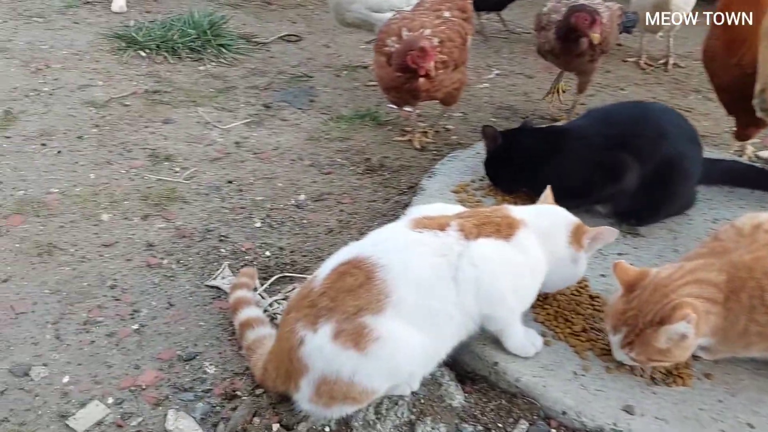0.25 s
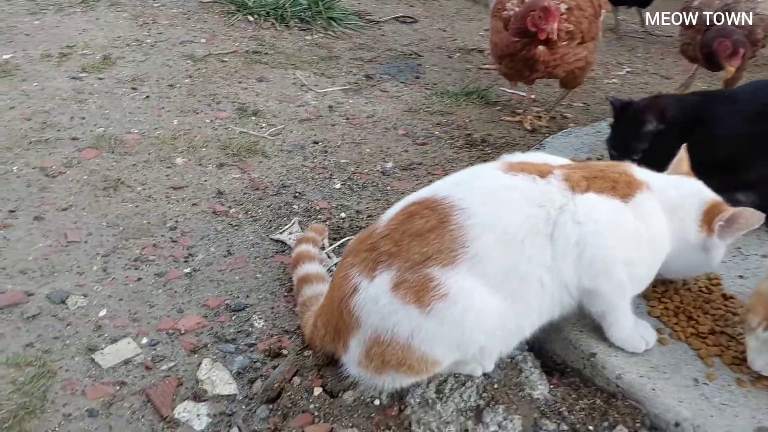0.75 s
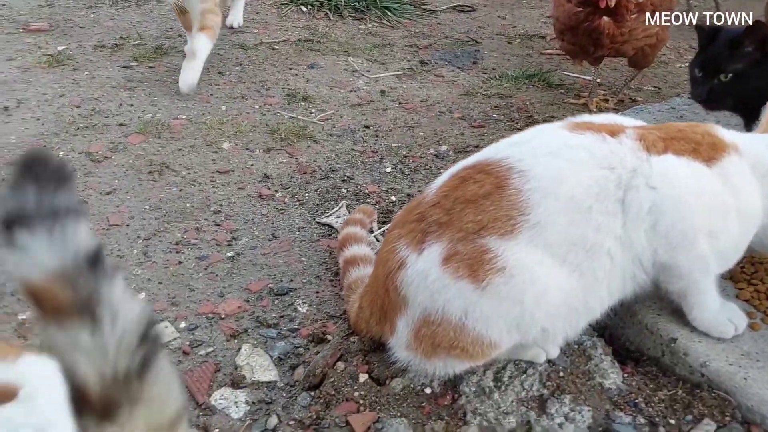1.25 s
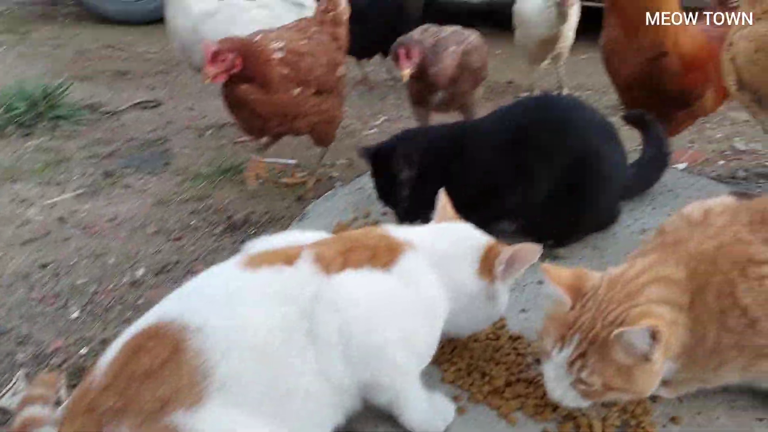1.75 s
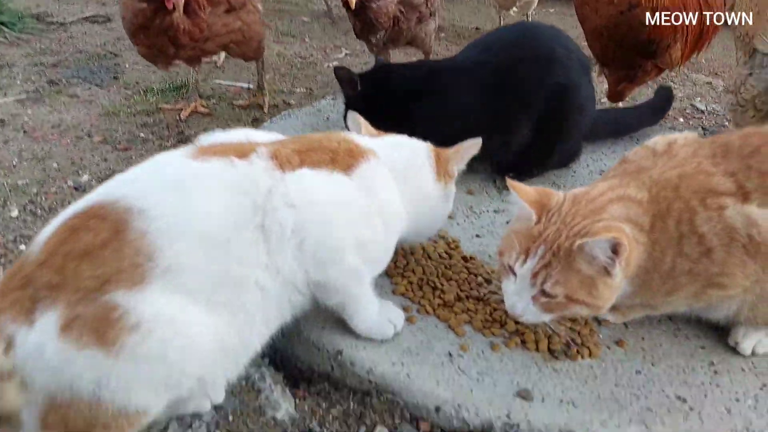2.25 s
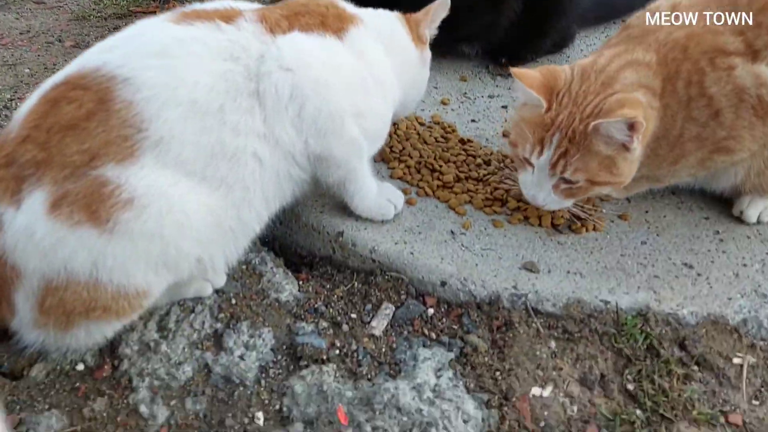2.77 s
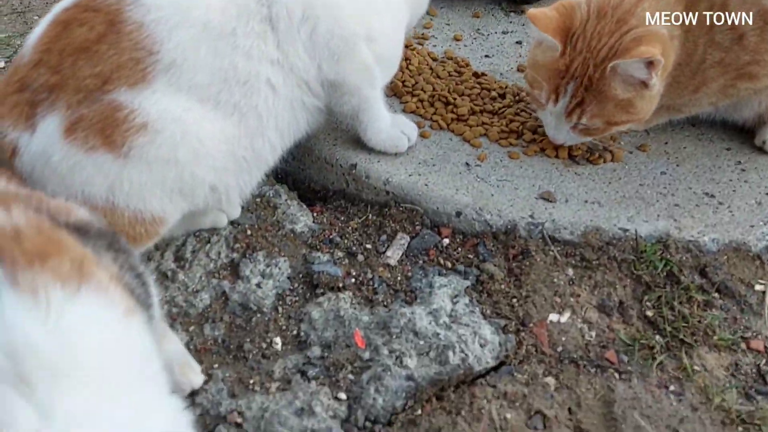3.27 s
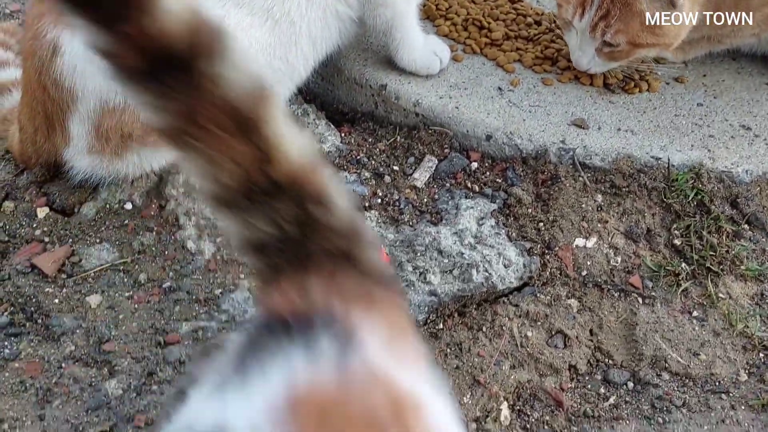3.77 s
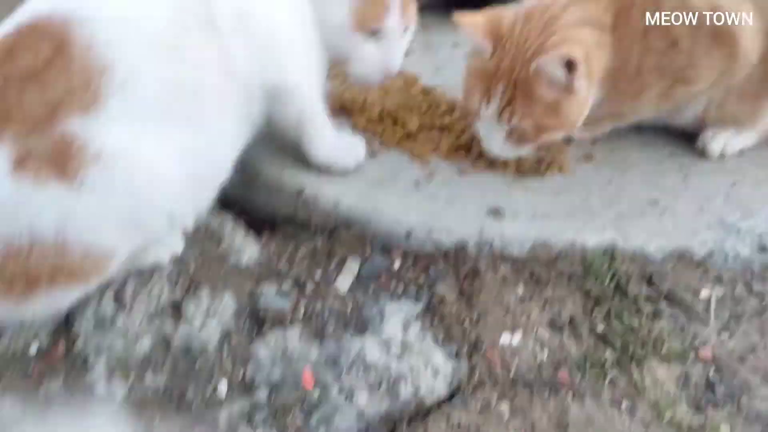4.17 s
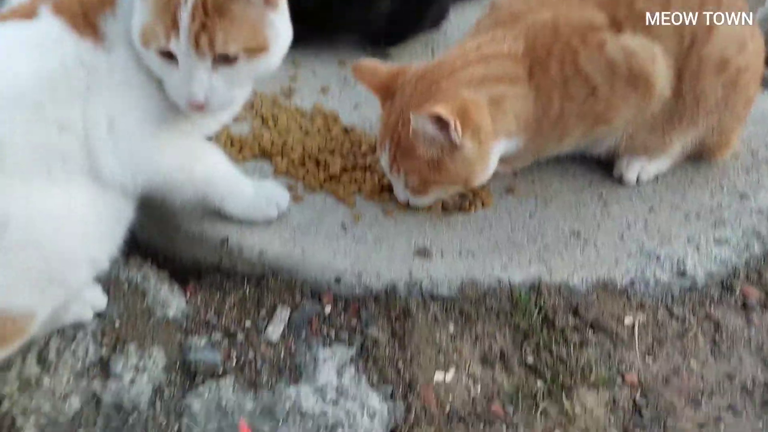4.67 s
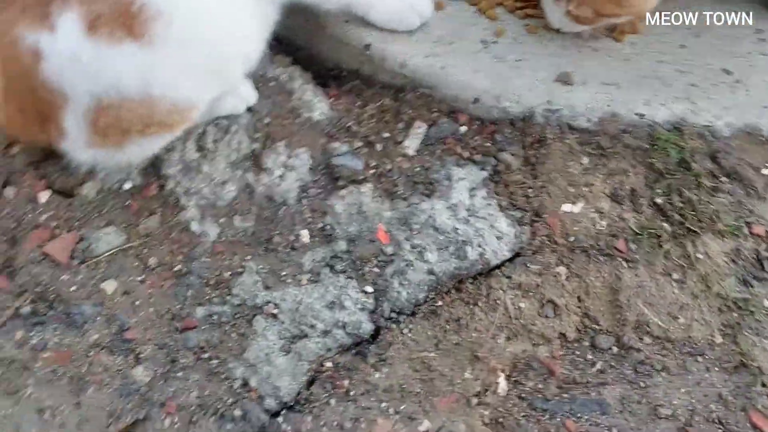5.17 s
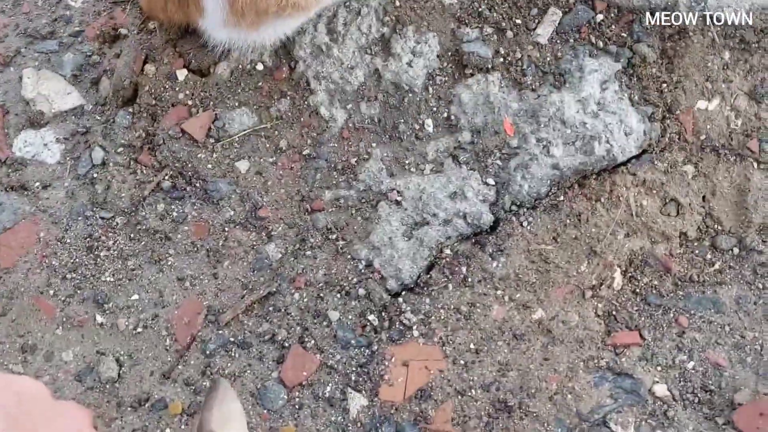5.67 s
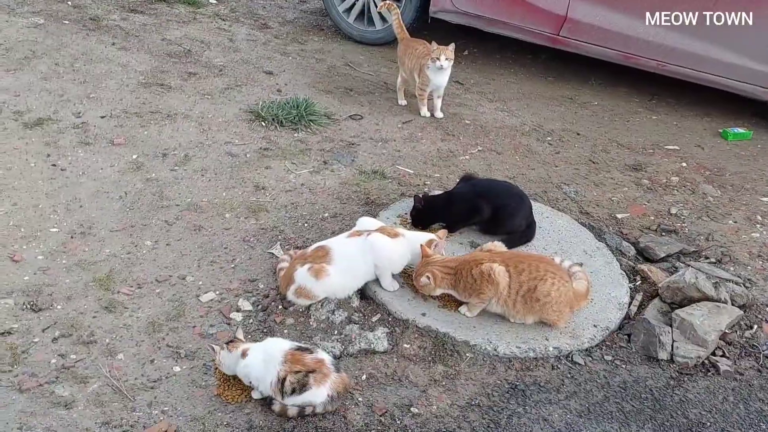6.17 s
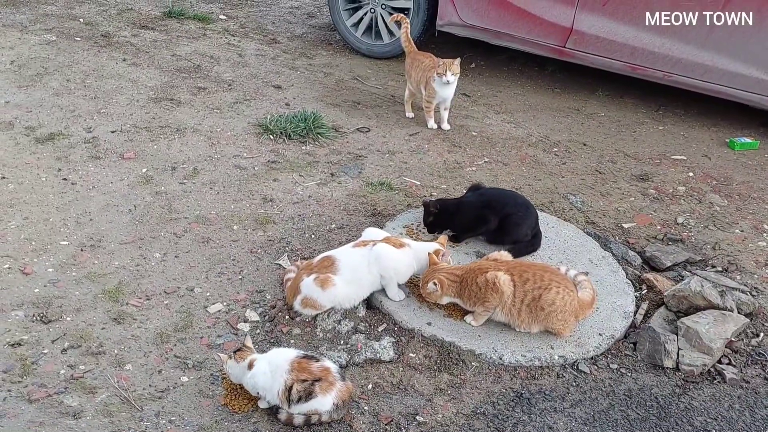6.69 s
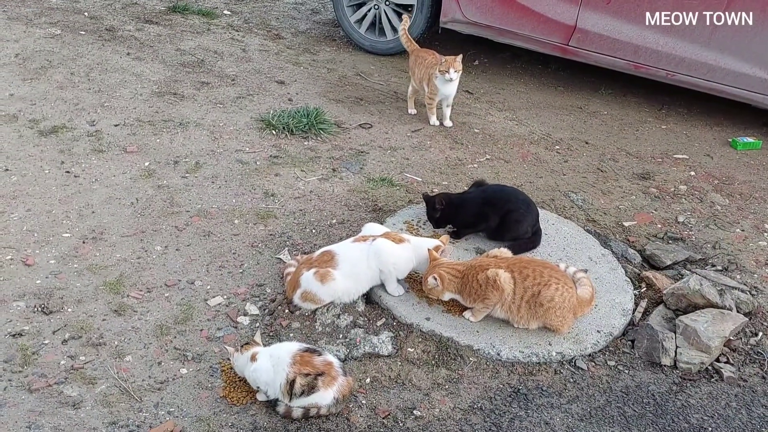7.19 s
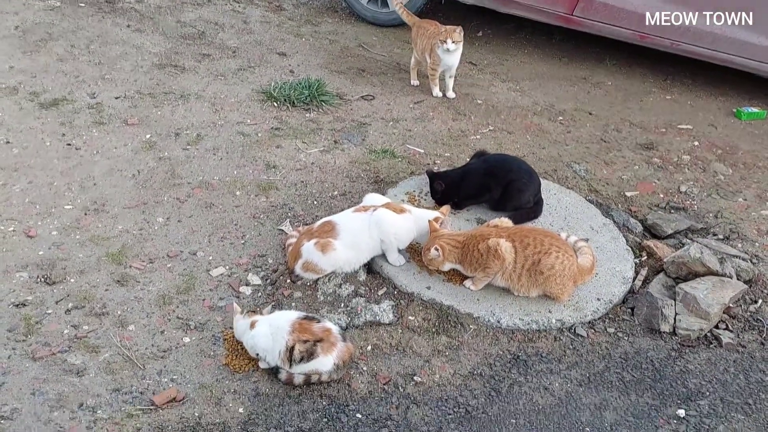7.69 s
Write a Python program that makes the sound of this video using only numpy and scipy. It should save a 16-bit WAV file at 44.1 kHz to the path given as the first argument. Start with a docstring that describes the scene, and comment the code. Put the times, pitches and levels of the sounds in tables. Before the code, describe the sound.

Outdoors, a handheld stereo microphone is close to several cats eating dry kibble on a concrete slab. From 0 s there is low uneven rumble, soft air and fine crackling, with light pellet taps and a dull scuff at 0.2 and 0.5 s. Small cracks cluster around 0.8 s with a strong left-sided wind buffet at 0.9 s. Sparse taps follow, then a sharp bright snap at 2.16 s, another wind puff at 2.3 s and busy rooting and pellet clicks to 3.4 s. Loud hollow crunches come at 3.8, 4.6, 5.0, 5.15 and 5.55 s, the last ones with scuffs and soft thumps; wind puffs again near 3.9 s. At about 5.83 s the sound nearly vanishes for under a tenth of a second. Afterwards, further back, no munching: quiet steady rumble and air, low left-sided wind thumps at 6.6 and 6.8 s, and very faint hisses around 6.5 and 7.7 s.

```python
"""Cats crunch dry kibble on a concrete slab, close to a handheld phone, over low rumble and puffs of wind.
Fracture chains drive resonances for the snaps; random crumb impulses make the chewing; pellets tap and ring.
Rumble and wind are coloured noise, wind strongest in the left port; low thumps are brief decaying sines.
After a brief dropout the phone stands further back: no munching, steady rumble and yard air, faint hisses."""
import sys
import numpy as np
from scipy import signal
from scipy.fft import rfft, irfft
from scipy.io import wavfile
from scipy.ndimage import uniform_filter1d

SR = 44100
rng = np.random.default_rng(int(sys.argv[2]) if len(sys.argv) > 2 else 0)


def store_pcm(level_fs):
    """Save levels as 16-bit WAV."""
    pcm = np.round(np.clip(level_fs, -1, 1) * 32767).astype(np.int16)
    wavfile.write(sys.argv[1], SR, np.atleast_2d(pcm).T)


N = 349801
TIME = np.arange(N) / SR

# Brittle snaps. Each row: break in seconds, time scale of the fractures in ms, ring in Hz, ring level in dB,
# splinters relative to the ring in dB, knock relative to the ring in dB, left minus right in dB.
SNAPS = [(0.4745, 2.84, 1980, -42, -10, -1, -7), (0.586, 2.55, 2070, -38.5, -14, -14, -11),
         (0.7945, 2.46, 1900, -35.5, -19, -23, 4), (0.8013, 2.2, 2010, -34.5, -29, -21, -20),
         (0.8526, 1.9, 2110, -34.5, -18, -9, -7), (0.8596, 1.5, 2480, -36, -16, -8, -10),
         (2.1601, 0.31, 5110, -20.5, -16, -19, 0), (2.92, 2.2, 1680, -43, 5, -3.5, 6),
         (3.123, 4.3, 1810, -41, -12, 2, -1), (3.7147, 1.25, 1940, -33.5, -22, -4.5, -6),
         (3.7967, 1.1, 1980, -21.5, -9.5, -21, 0.5), (4.115, 1.51, 2030, -36, -50, -15, -4),
         (4.232, 1.4, 1560, -38.5, -28, 4, -14), (4.603, 1.28, 1680, -20.5, -12, -11.5, 3.5),
         (4.8488, 2.9, 2140, -34.5, -18, -15, 6), (5.008, 1.5, 1930, -21.5, -12, -7, -2),
         (5.1507, 1.36, 2170, -25.5, -12.5, 0.5, -1), (5.272, 4.9, 1930, -31.5, -17, 3, 0),
         (5.5506, 1.95, 2110, -21.5, 0, -1, 1)]
# Colour of fine splinters. Each row: frequency in Hz, gain in dB.
SPLINTER_COLOUR = [(4000, -29.5), (7500, 0), (9300, -8), (12300, 0), (15300, -4.5), (17000, -8.5)]

DROPOUT_START_S, DROPOUT_END_S = 5.825, 5.905
TURN_S = 4.55  # the phone turns away from the cats
PORT_LAG_MS, TURNED_LAG_MS = 0.47, 0.35
TREBLE_DETOUR = 1.1  # factor on the port lag of bright parts
LEAD_SAMPLES = 400  # faint rising noise ahead of a break
SNAP_PER_BRIGHT = 0.23  # dB of snap per dB of splinters
PELLET_PAN_DB = -3


def undb(db):
    """Decibels to gain."""
    return 10 ** (np.asarray(db) / 20)


def unit(x):
    """Scale to rms 1."""
    return x / np.sqrt(np.mean(x ** 2))


def pan(left_minus_right_db):
    """Left and right gains of constant total power."""
    gains = undb(np.array([[left_minus_right_db], [-left_minus_right_db]]) / 2)
    return unit(gains)


def add(out, s, sound):
    """Mix a sound in at time s."""
    i = int(s * SR)
    out[:, i:i + sound.shape[1]] += sound[:, :N - i]


def burst(x, db):
    """Scale a short sound so that its energy, spread over 12 ms, has the given level."""
    return x * undb(db) * np.sqrt(0.012 * SR / np.sum(x ** 2))


def colour(x, points, size=1024):
    """Causal minimum-phase filter through (Hz, dB) points, from the cepstrum of its log gain."""
    hz, db = np.transpose(points)
    f = np.maximum(np.arange(size // 2 + 1) * SR / size, 1)
    log_gain = np.log(undb(np.interp(np.log(f), np.log(hz), db)))
    cepstrum = irfft(log_gain)
    cepstrum[1:size // 2] *= 2
    cepstrum[size // 2 + 1:] = 0
    impulse = irfft(np.exp(rfft(cepstrum)))
    return signal.fftconvolve(x, impulse)[:len(x)]


def ring(x, hz, pass_width_hz):
    """A resonance applied twice, for steep skirts; the width is that of one pass."""
    b, a = signal.iirpeak(hz, hz / pass_width_hz, fs=SR)
    return signal.lfilter(b, a, signal.lfilter(b, a, x))


def mode(x, hz, t60_s):
    """One freely decaying mode, rung by x."""
    t = TIME[:len(x)]
    decay = undb(-60 * t / t60_s)
    return signal.fftconvolve(x, decay * np.sin(2 * np.pi * hz * t))[:len(x)]


def walk(rate_hz, size=N):
    """Random levels held 1 / rate_hz seconds, slewed twice, rms 1."""
    k = int(SR / rate_hz)
    steps = np.repeat(rng.standard_normal(size // k + 1), k)
    return unit(uniform_filter1d(uniform_filter1d(steps, k), k)[:size])


def noise(points):
    """Noise of a given colour, rms 1."""
    return unit(colour(rng.standard_normal(N), points, size=8192))


def swell(s, hold_s, attack_s, release_s):
    """Linear rise that is full at time s, a hold, and an exponential fall of time constant release_s."""
    fall = np.arange(0, 8, 0.5)
    times = [s - attack_s, s, *(s + hold_s + fall * release_s)]
    return np.interp(TIME, times, [0, 1, *np.exp(-fall)], right=0)


def near_then_far(near, far_db):
    """Gain along (s, dB) points close to the cats, constant from further back."""
    near_db = np.interp(TIME, *np.transpose(near))
    return undb(np.where(TIME < DROPOUT_START_S, near_db, far_db))


def ports(x, lag_ms):
    """Sound reaches the right port a little later, depending on where it comes from."""
    return np.array([x, np.roll(x, int(lag_ms * SR / 1e3))])


def port_lag_ms(s):
    """Lag of the right port at time s: shorter once the phone has turned away."""
    return PORT_LAG_MS if s < TURN_S else TURNED_LAG_MS


def fracture(ms, size=2048, count=60, lead_level=0.026):
    """A faint rising noise leads into the break, then a chain of smaller breaks follows."""
    push = np.zeros(size)
    rise = np.linspace(0, 1, LEAD_SAMPLES) ** 3
    push[:LEAD_SAMPLES] = lead_level * rng.standard_normal(LEAD_SAMPLES) * rise
    delay = rng.uniform(0, 3, count)  # in units of ms
    breaks = rng.standard_normal(count) * np.sqrt(delay) * np.exp(-1.7 * delay)
    offset = np.clip(delay * ms * SR / 1e3, 0, size // 2).astype(int)
    np.add.at(push, LEAD_SAMPLES + offset, breaks)
    push[LEAD_SAMPLES] += 1.0
    return push


def cracks(ring_width_hz=1050, knock_lag_ms=0.29, snap_db=-1.5, linger_db=-2.5):
    """Each fracture drives a hollow ring, lingering modes, a bright snap, fine splinters and a dull knock."""
    # Each row: multiple of the ring's pitch, cycles until 60 dB down, level in dB.
    linger_modes = [(.92, 16, 2.5), (1.1, 29.5, 4)]
    # Colours of snap and knock. Each row: frequency in Hz, gain in dB.
    snap_colour = [(1500, -43), (2900, -6), (3700, 4), (6200, 4), (7600, -6), (16000, -27)]
    knock_colour = [(150, -22.5), (450, 1.5), (720, 5.5), (1250, 4.5), (1800, -15.5), (3500, -3.5),
                    (9000, -52)]
    out = np.zeros((2, N))
    for s, ms, hz, db, bright_db, knock_db, pan_db in SNAPS:
        push = fracture(ms)
        # slow breaks ring more purely than sudden ones
        hollow = burst(ring(push, hz, ring_width_hz / np.sqrt(ms)), db)
        linger = 0
        for k, cycles, mode_db in linger_modes:
            linger = linger + undb(mode_db) * mode(fracture(ms), hz * k, cycles / (hz * k))
        hollow = hollow + burst(linger, db + linger_db)
        knock = burst(colour(push, knock_colour), db + knock_db)
        snap = colour(fracture(ms) - push, snap_colour)
        snap = burst(snap, db + snap_db + SNAP_PER_BRIGHT * bright_db)
        splinters = burst(colour(fracture(ms) + push, SPLINTER_COLOUR), db + bright_db)
        lag_ms = port_lag_ms(s)
        low = ports(knock, knock_lag_ms) + ports(hollow, lag_ms)
        high = ports(snap + splinters, TREBLE_DETOUR * lag_ms)
        add(out, s - LEAD_SAMPLES / SR, (low + high) * pan(pan_db))
    return out


def crumbs(size, hz, bright_db, rate_hz, rasp, count=4, snap_db=-2):
    """Several mouths grind crumbs: tiny fractures, very uneven in size, about rate_hz in each mouth."""
    fade = np.exp(-1 / (0.0007 * SR))
    out = 0
    for angle in np.linspace(0.45, 1.6, count):
        sizes = undb(4.2 * np.minimum(rng.exponential(size=size), 4))
        sizes = sizes * (rng.random(size) < rate_hz / SR)
        # a crumb crumbles for about a millisecond, over a steady rasp
        grains = unit(signal.lfilter([1], [1, -fade], sizes))
        grains = (grains + rasp) * undb(2.5 * walk(100, size))
        # energy is shared at random between ring, snap and splinters
        low, mid, high = grains * rng.standard_normal((3, size))
        hollow = unit(ring(low, hz, pass_width_hz=1570))
        snap = unit(ring(mid, 4750, pass_width_hz=3100)) * undb(snap_db + SNAP_PER_BRIGHT * bright_db)
        splinters = unit(colour(high, SPLINTER_COLOUR)) * undb(bright_db)
        # each cat sits at another angle to the ports
        lag_ms = PORT_LAG_MS * angle
        out = out + ports(hollow, lag_ms) * pan(-7.0)
        out = out + ports(snap, TREBLE_DETOUR * lag_ms) * pan(-2.0)
        out = out + ports(splinters, lag_ms) * pan(-0.5)
    return out / np.sqrt(count)


def chews(size=26000, rate_hz=220, rasp=0.12, attack_s=0.018, release_s=0.037):
    """A cat bites down or roots in the pile: a short swell of coarse crumbs with its own ring."""
    # Each row: full at in seconds, hold in seconds, ring in Hz, level in dB, splinters rel. to ring in dB.
    bouts = [(0.855, 0.077, 3140, -41.5, -18), (2.179, 0.43, 5300, -53, -14.5),
             (2.401, 0.14, 5070, -45.5, -13), (2.92, 0.11, 4900, -53, -22),
             (3.281, 0.092, 3850, -48.5, -4.5), (3.712, 0.365, 2000, -47.5, -50),
             (4.267, 0.16, 3340, -53.5, -17.5), (5.08, 0.021, 2560, -48, -2)]
    out = np.zeros((2, N))
    for s, hold_s, hz, db, bright_db in bouts:
        start_s = s - attack_s
        effort = swell(s, hold_s, attack_s, release_s)[int(start_s * SR):][:size]
        add(out, start_s, undb(db) * effort * crumbs(size, hz, bright_db, rate_hz, rasp))
    return out


def munching(rate_hz=300, rasp=0.33, ring_hz=1938, bright_db=-10, debris_db=-13.5, debris_s=0.035):
    """Fine crackle of crumbs that wavers with the jaws and flares after each crack with its knock level."""
    # All cats, as the phone is turned to and from them. Each row: time in seconds, level in dB.
    munch_level = [(0, -58.5), (0.9, -45.5), (1.3, -61), (2.0, -67), (2.2, -51), (3.6, -58.5), (4.7, -55),
                   (5.45, -59), (5.8, -64)]
    jaws_db = 2 * walk(22)
    power = undb(np.interp(TIME, *np.transpose(munch_level)) + jaws_db) ** 2
    power = power * (TIME < DROPOUT_START_S)
    for s, ms, _, db, _, knock_db, _ in SNAPS:
        power += (undb(db + knock_db + debris_db) * swell(s, 0, ms / 1e3, debris_s)) ** 2
    return crumbs(N, ring_hz, bright_db, rate_hz, rasp) * np.sqrt(power)


def pellets(contact_ms=1.0, linger_db=-5, ring_cycles=69):
    """Nudged pellets tap on concrete and ring on, each at its own pitch; the tilt sets the high modes."""
    # Each row: contact in seconds, level in dB, tilt of the ring in dB per octave.
    taps = [(0.186, -51.5, 12), (0.249, -42.5, 0.5), (0.342, -44.5, 14), (0.597, -41, 6.5),
            (0.8364, -38, 3), (0.843, -35.5, 1), (0.873, -36, -1), (0.964, -41.5, 7), (1.137, -45, -2),
            (1.165, -45, 2), (1.32, -47.5, 6), (1.415, -43.5, 2), (1.509, -46.5, 7.5), (1.587, -49.5, -1),
            (1.651, -49, -1), (2.278, -41.5, 4), (2.445, -36.5, 10.5), (2.4597, -42, 7), (2.526, -41, 11),
            (2.726, -43, 12.5), (2.985, -45, 6), (3.134, -42, -4), (3.161, -38.5, 2.5),
            (3.249, -40.5, 13.5), (3.286, -43.5, 10.5), (3.296, -49, 9), (3.316, -42, 12.5),
            (3.377, -44, 4), (3.432, -44, 6), (3.607, -45, 5.5), (3.755, -39, -6), (3.929, -45, 15.5),
            (3.992, -56, 33), (4.010, -51, 18), (4.057, -49, -6), (4.326, -43.5, -10), (4.4957, -45, 4.5),
            (4.802, -41.5, 2.5), (4.831, -37.5, -6), (4.842, -31.5, -6), (5.0773, -33.5, -1),
            (5.278, -40, 9), (5.504, -41, -8)]
    # Each row: highest pitch in Hz, width of one resonator pass in Hz, level in dB before the tilt.
    pellet_modes = [(2120, 910, 18.5), (5710, 2730, 5.5), (13000, 3500, -16)]
    out = np.zeros((2, N))
    for s, db, tilt_db in taps:
        push = fracture(contact_ms)
        pitch = rng.uniform(0.88, 1)
        tap, linger = 0, 0
        for hz, width_hz, mode_db in pellet_modes:
            part = undb(mode_db + tilt_db * np.log2(hz)) * ring(push, hz * pitch, width_hz)
            tap = tap + part
            # t60 spans ring_cycles of the highest pitch
            linger = linger + mode(part, hz * pitch, ring_cycles / hz)
        sound = burst(tap, db) + burst(linger, db + linger_db)
        lag_ms = port_lag_ms(s) * rng.uniform(0.65, 1)
        add(out, s - LEAD_SAMPLES / SR, ports(sound, lag_ms) * pan(PELLET_PAN_DB))
    return out


def pings(rise_share=0.029):
    """A brief ring on a single pitch; the longer it rings, the softer it starts."""
    # Each row: start in seconds, pitch in Hz, t60 in seconds, level in dB.
    ping_rows = [(2.066, 2024, 0.024, -34), (2.422, 5100, .014, -40), (2.5162, 5100, .014, -41),
                 (2.711, 5080, 0.014, -44)]
    out, t = np.zeros((2, N)), TIME[:SR // 10]
    for s, hz, t60_s, db in ping_rows:
        rise = 1 - np.exp(-t / (rise_share * t60_s))
        tone = np.sin(2 * np.pi * hz * t) * undb(-60 * t / t60_s) * rise
        add(out, s, ports(burst(tone, db), PORT_LAG_MS) * pan(PELLET_PAN_DB))
    return out


def scuffs(rough_db=4, hz=1345, width_hz=1900, attack_s=0.004, release_s=0.016):
    """Shifting feet and fingers give a dull, uneven rasp of resonant noise."""
    # Each row: full at in seconds, hold in seconds, level in dB.
    rubs = [(0.211, 0.021, -39.5), (0.468, 0.0066, -35), (5.264, 0.0152, -36), (5.543, 0.0053, -31)]
    press = sum(undb(db) * swell(s, hold_s, attack_s, release_s) for s, hold_s, db in rubs)
    rough = rng.standard_normal(N) * undb(rough_db * walk(300))
    return ports(press * unit(ring(rough, hz, width_hz)), lag_ms=0.21)


def yard(x, t60_s=0.11, scatter_db=-18, treble_pan_db=9):
    """Ground and walls add a short faint scatter; until the turn the highest treble is lifted on the left."""
    t = TIME[:SR // 4]
    scatter = rng.standard_normal((2, len(t))) * undb(-60 * t / t60_s) * (1 - np.exp(-t / 0.0018))
    scatter = signal.lfilter(*signal.butter(1, 5000, fs=SR), scatter)
    scatter /= np.sqrt(np.sum(scatter ** 2, axis=1, keepdims=True))
    heard = x + undb(scatter_db) * signal.fftconvolve(x, scatter, axes=1)[:, :N]
    treble = signal.sosfiltfilt(signal.butter(3, 7500, "high", fs=SR, output="sos"), heard)
    # the added treble is near zero on the right
    return heard + treble * (pan(treble_pan_db) - 0.5) * (TIME < TURN_S)


def thumps(rise_s=0.0029):
    """Soft low thumps of hand and wind gusts, brief decaying sines; higher modes die sooner."""
    # Each row: start in seconds, level in dB, pitch in Hz, t60 at that pitch in s, left minus right in dB.
    thump_rows = [(0.933, -16.5, 176, 0.1, 23), (4.2347, -17.5, 217, 0.026, 7),
                  (5.2643, -16, 139.7, 0.12, 3.5), (5.546, -21.5, 138, 0.098, 2),
                  (6.625, -8.5, 153, 0.031, 25), (6.823, -9, 113, 0.032, 17.5)]
    # Each row: multiple of the pitch, level in dB.
    thump_modes = [(0.999, 1.5), (1.901, 3.5), (3.1, -17)]
    out, t = np.zeros((2, N)), TIME[:SR // 4]
    for s, db, hz, t60_s, pan_db in thump_rows:
        thud = 0
        for k, mode_db in thump_modes:
            thud = thud + undb(mode_db - 60 * t * k / t60_s) * np.sin(2 * np.pi * k * hz * t)
        add(out, s, undb(db) * thud * (1 - np.exp(-t / rise_s)) * pan(pan_db))
    return out


def wind(flutter_db=2, breeze_db=-52, attack_s=0.034, release_s=0.027):
    """Eddies buffet the left port; stronger puffs carry relatively more of the higher-pitched eddies."""
    # Each row: full at in seconds, hold in seconds, level in dB.
    puff_rows = [(0.072, 0.1, -29.5), (0.891, 0.1, -15.5), (1.004, 0.21, -26), (2.304, 0.053, -16),
                 (2.415, 0.032, -23), (3.461, 0.12, -27), (3.681, 0.15, -27), (3.889, 0.15, -19.5),
                 (6.563, 0.054, -20.5), (6.724, 0.12, -27.5), (6.946, .16, -29.5), (7.348, 0.49, -43.5)]
    # Each row: frequency in Hz, gain in dB.
    wind_colour = [(20, -28), (40, -8.5), (65, 3), (130, 1), (200, -6.5), (290, -15), (420, -35.5),
                   (2000, -73.5)]
    puffs = [undb(db) * swell(s, hold_s, attack_s, release_s) for s, hold_s, db in puff_rows]
    gust_db = 10 * np.log10(undb(breeze_db) ** 2 + sum(puff ** 2 for puff in puffs))
    buffet = noise(wind_colour) * undb(gust_db + flutter_db * walk(45))
    eddies = unit(ring(rng.standard_normal(N), 260, pass_width_hz=86))
    eddies = eddies * undb(1.24 * gust_db - 15.0 + 8.5 * walk(60))
    sheltered = noise(wind_colour) * undb(gust_db - 31)
    return np.array([buffet + eddies, sheltered])


def handling_rumble(own_share=0.67, far_db=-50, dip_db=-11.5):
    """Uneven low noise of the hand, largely common to both ports; the left level dips briefly."""
    # Each row: frequency in Hz, gain in dB.
    rumble_colour = [(20, -36), (40, -2), (62, 2), (140, 0), (260, -4.5), (340, -10), (480, -29.5),
                     (1000, -61)]
    # Each row: time in seconds, level in dB.
    near_level = [(0, -34), (2.3, -38), (3.9, -36), (4.5, -39), (5.1, -39.5), (5.8, -47)]
    common = noise(rumble_colour)
    rumble = unit(np.array([common + own_share * noise(rumble_colour) for _ in range(2)]))
    rumble *= near_then_far(near_level, far_db) * undb(1.5 * walk(25))
    rumble[0] *= undb(dip_db * swell(4.13, 0.35, attack_s=0.054, release_s=0.034))
    return rumble


def yard_air(far_db=-50.5):
    """Soft wavering noise of the yard's air; long waves reach both ports alike."""
    # Each row: frequency in Hz, gain in dB.
    air_colour = [(200, -2.5), (380, 2.5), (850, -0.5), (1500, -5.5), (2400, -10.5), (3300, -31),
                  (16000, -36)]
    # Each row: time in seconds, level in dB.
    near_level = [(0, -47), (1.9, -51.5), (2.4, -49.5), (4.0, -47), (4.3, -52), (4.9, -48), (5.5, -55.5)]
    left, right = noise(air_colour), noise(air_colour)
    # below 600 Hz the right follows the left
    right += signal.sosfiltfilt(signal.butter(2, 600, fs=SR, output="sos"), left - right)
    waver_db = 0.6 * walk(9)
    return np.array([left, right]) * near_then_far(near_level, far_db) * undb(waver_db)


def hiss(flicker_db=3, attack_s=0.27, release_s=0.084, pan_db=-15):
    """Thin, flickering bands of noise swell and fade near the end."""
    # Each row: full at in seconds, hold in seconds, centre in Hz, width of one resonator pass in Hz, level in dB.
    hiss_rows = [(6.42, .38, 3600, 1400, -75), (7.74, .07, 12660, 2830, -67)]
    out = 0
    for s, hold_s, hz, width_hz, db in hiss_rows:
        band = unit(ring(rng.standard_normal(N), hz, width_hz) * undb(flicker_db * walk(40)))
        out = out + band * swell(s, hold_s, attack_s, release_s) * undb(db)
    return out * pan(pan_db)


def scene():
    """Crunching in the yard, with thumps, wind, rumble, air and hiss."""
    crunching = cracks() + chews() + munching() + pellets() + pings() + scuffs()
    return yard(crunching) + thumps() + wind() + handling_rumble() + yard_air() + hiss()


def record(dry):
    """Peaks are rounded off, the level drops 42 dB for a moment and the top is cut at 16 kHz."""
    live = 1.0 * ((TIME < DROPOUT_START_S) | (TIME > DROPOUT_END_S))
    live = uniform_filter1d(live, size=400)
    rounded = np.tanh(dry) * np.maximum(live, undb(-42))
    return signal.sosfilt(signal.ellip(8, 0.2, 70, 16000, fs=SR, output="sos"), rounded)


dry = scene()
out = record(dry)
store_pcm(out)
```